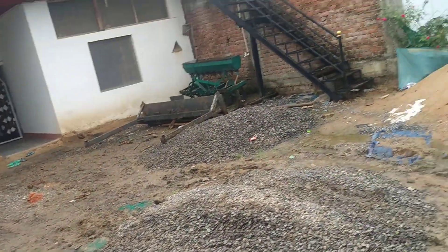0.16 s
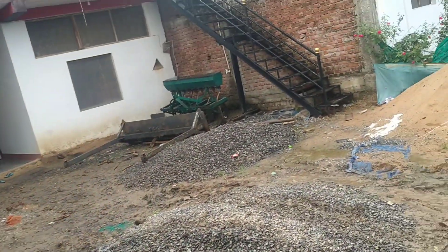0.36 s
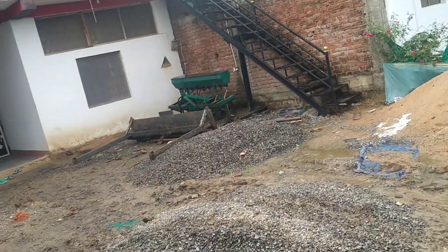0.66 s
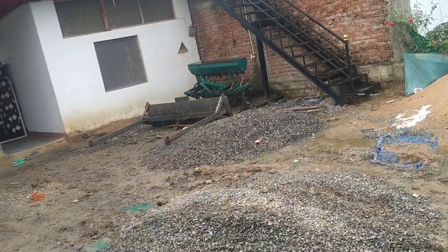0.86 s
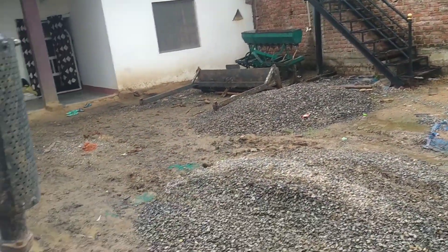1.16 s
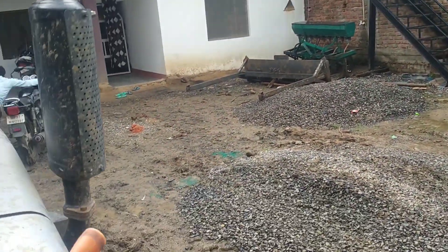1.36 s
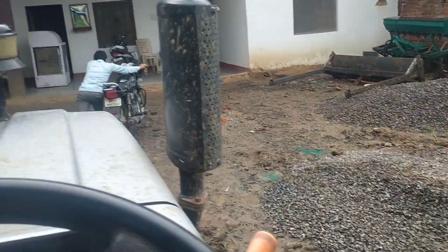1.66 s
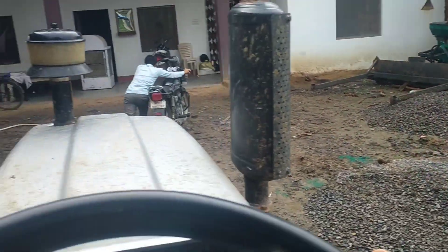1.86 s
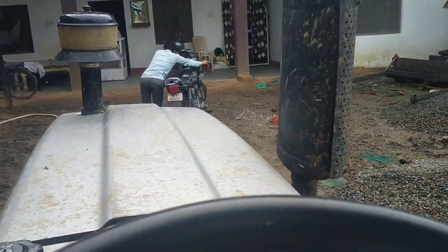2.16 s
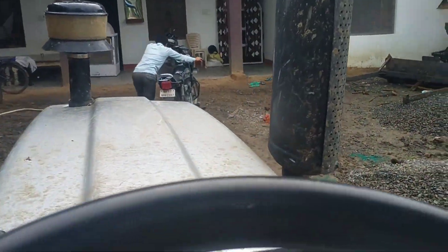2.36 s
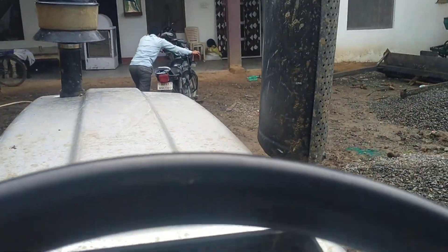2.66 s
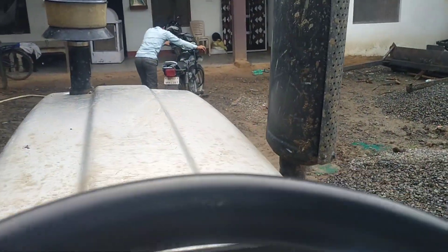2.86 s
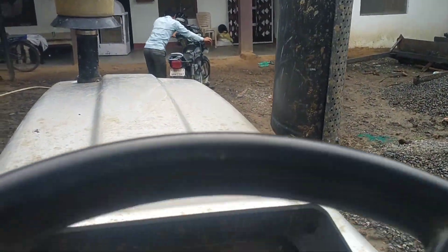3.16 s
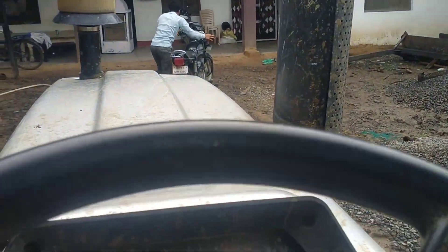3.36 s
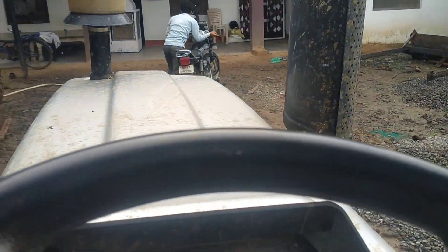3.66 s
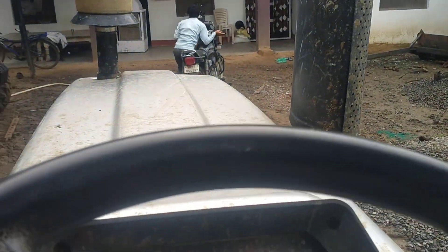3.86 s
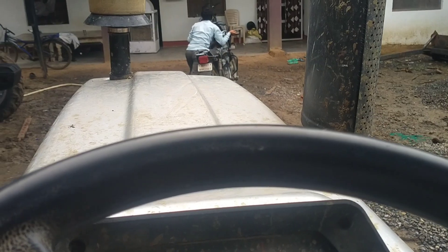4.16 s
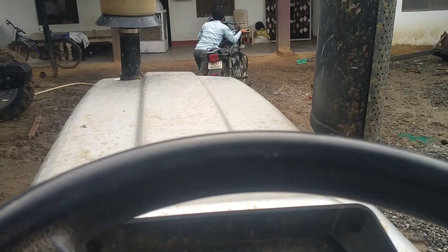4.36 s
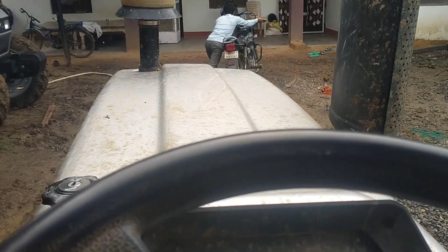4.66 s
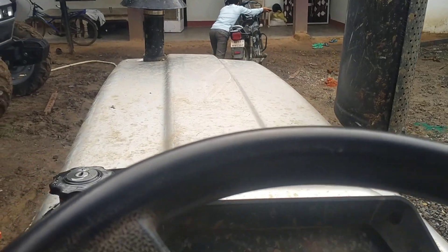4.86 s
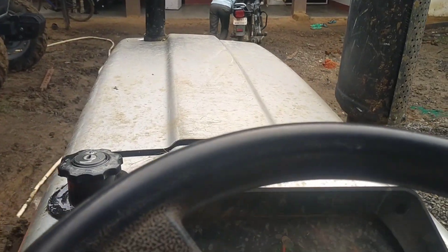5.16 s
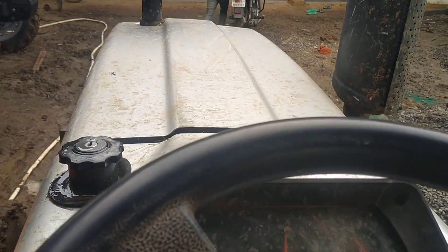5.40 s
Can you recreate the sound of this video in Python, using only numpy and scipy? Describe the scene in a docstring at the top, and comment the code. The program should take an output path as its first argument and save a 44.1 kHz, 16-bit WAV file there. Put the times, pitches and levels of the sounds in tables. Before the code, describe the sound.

A tractor diesel idles with fast, uneven knocking, is shut off and clatters to a stop, then a sharp metallic scrape and dull clunk.

```python
"""In a walled yard, heard from the driver's seat, a three-cylinder tractor diesel idles unevenly.
Noise bursts through block resonances make the knocks, filtered pulses the exhaust. The governor hunts:
four fuelled strokes, then two slack ones. The fuel is cut and the engine clatters to rest.
Then resonant noise makes a sharp metallic scrape; a dull clunk with a sinking tone follows,
probably the stop knob sliding home."""
import sys
import numpy as np
from scipy import signal
from scipy.fft import rfft, irfft
from scipy.io import wavfile
from scipy.ndimage import uniform_filter1d

SR = 44100
rng = np.random.default_rng(int(sys.argv[2]) if len(sys.argv) > 2 else 0)


def generate_wav(signal):
    """Clip the signal to [-1, 1] and save it as 16-bit WAV at the path in sys.argv[1]."""
    frames = np.transpose(np.atleast_2d(signal))
    scaled = np.clip(frames, -1, 1) * 32767
    pcm = np.round(scaled).astype(np.int16)
    wavfile.write(sys.argv[1], SR, pcm)


N = 243873
TIME = np.arange(N) / SR
# when the fuel is cut, and the time in which the crank speed then falls to 1/e
FUEL_CUT_S, COAST_S = 2.39, 0.94

# Levels in all tables are relative: filters normalise the spectra, and most functions add a level of their own.
# clacks of gears and pistons as the engine runs down: start_s, level_db, hold_s
CLACK_TIMES = [(2.571, -20.5, 0.0098), (2.646, -24.5, 0.017), (2.716, -26.5, 0.022), (2.802, -19.5, 0.01),
               (2.89, -25.5, 0.025), (2.99, -29, 0.031), (3.092, -25, 0.0092), (3.142, -26.5, .012),
               (3.224, -31, 0.039), (3.276, -27, 0.0098), (3.354, -30, 0.013), (3.403, -32.5, 0.028),
               (3.436, -31.5, 0.01), (3.558, -31, 0.0046), (3.664, -30.5, 0.0068), (3.791, -31.5, 0.025),
               (3.849, -37, 0.008), (3.901, -30, 0.008), (4.154, -34.5, .014), (4.421, -36.5, .016),
               (4.593, -35, .008), (4.62, -38.5, 0.012), (4.65, -34, 0.011), (4.73, -35, 0.015),
               (4.969, -38, .017)]
# spectrum of the firing block: frequency_hz, level_db (per Hz)
BLOCK_SPECTRUM = [(88, -44), (150, 2.5), (253, -13.5), (290, -6), (345, -8), (403, 1), (630, -5.5),
                  (1040, 2.5), (1870, 0.5), (2700, -2.5), (5220, -18), (6330, -17), (8980, -28),
                  (13200, -23), (15400, -29.5)]
# spectrum of the coasting engine: frequency_hz, level_db (per Hz)
COASTING_SPECTRUM = [(88, -32), (150, -9.5), (248, -9), (290, -7), (332, -5), (471, 0.5), (561, -5.5),
                     (1060, -2), (1290, -5.5), (1690, 0), (2970, -6.5), (4730, -23.5), (6580, -23.5),
                     (8980, -37), (15400, -33)]
# resonances of block and bonnet: frequency_hz, width_hz, lift_db
PANEL_MODES = [(297, 29, 8.5), (397, 12, 4.5), (488.3, 26, 7), (551, 8.3, 3), (789, 42, 5), (862, 7.4, 5),
               (1058, 52, 2), (1210, 230, -0.5), (1396, 65, 2.5), (1570, 38, 0), (1715, 9, -5),
               (1687, 110, 4.5), (1954, 10, 9), (2170, 21, 8), (2295, 67, 1.5), (2634, 300, 2),
               (2956, 32, 6.5), (3450, 34, 5.5), (3970, 170, 3.5)]
# the dash panel's low boom: frequency_hz, level_db (per Hz)
DASH_SPECTRUM = [(60, -30), (105, 0), (130, 2), (175, 8.5), (230, -3), (290, -17), (600, -47), (2000, -83)]


def amp(db):
    """Level to amplitude: 20 dB is a factor of ten."""
    return 10 ** (np.asarray(db) / 20)


def unit(x):
    """Power normalisation: scales to rms 1."""
    return x / np.sqrt(np.mean(x ** 2) + 1e-20)


def add(mix, s, sound):
    """Superposition: adds a sound to the mix, in place, from time s."""
    start = round(s * SR)
    sound = sound[max(-start, 0):]
    part = mix[max(start, 0):][:len(sound)]
    part += sound[:len(part)]


def colour(x, spectrum, modes=(), size=16384):
    """Minimum-phase filtering at unit power: a broad spectrum lifted by ringing resonances."""
    hz = abs(np.fft.fftfreq(size, 1 / SR))
    f, db = np.transpose(spectrum)
    shape_db = np.interp(np.log(hz + 1), np.log(f + 1), db)
    for centre, width, lift in modes:
        shape_db = shape_db + lift / (1 + (2 * (hz - centre) / width) ** 2)
    log_gain = np.log(amp(np.maximum(shape_db, -100)))
    # the Hilbert transform of the log gain gives the phase of a causal response
    response = np.exp(np.conj(signal.hilbert(log_gain)))
    ring = np.fft.ifft(response).real[:size // 2]
    return signal.oaconvolve(x, ring / np.linalg.norm(ring))[:N]


def grit(count, spread_db):
    """Impact noise: dense tiny impacts whose sizes vary over about a millisecond."""
    sizes = unit(uniform_filter1d(rng.standard_normal(count), size=44))
    return unit(rng.standard_normal(count) * amp(spread_db * np.clip(sizes, -2, 2)))


def blow(t, rise, t60, hold=0):
    """Exponential rise and decay: a blow starts at t = 0, is held, then loses 60 dB in each t60."""
    t = np.maximum(t, 0)
    attack = 1 - np.exp(-t / max(rise, 1e-4))
    return attack * amp(-60 * np.maximum(t - hold, 0) / t60)


def tint(x, treble_db, low_db, edge_db, uneven_db=3):
    """Spectral shaping: tilts one blow's bands and favours narrow bands by chance."""
    hz = np.fft.rfftfreq(len(x), 1 / SR)
    shelf_db = np.interp(hz, [650, 1100, 1800, 2700, 4000, 5500],
                         [low_db, 0, 0, edge_db, edge_db, treble_db])
    favoured_db = uneven_db * unit(uniform_filter1d(rng.standard_normal(len(hz)), size=30))
    return irfft(rfft(x) * amp(shelf_db) * unit(amp(favoured_db)), len(x))


def strokes():
    """Governor hunting: lists each stroke's time, its surge's strength and its surge row."""
    # surges of six strokes: start_s, strength_db, first_stroke_kick_db
    rounds = [(-0.099, 1, 0), (0.277, 0.5, 1.5), (0.655, 0, 0), (1.035, 0.4, -1.5), (1.421, 0.5, 0.2),
              (1.796, 0.5, -2), (2.178, -2.8, 3)]
    # strokes of a surge, four fuelled and two slack:
    # knock_db, clatter_rise_s, clatter_hold_s, crack_db, thud_db, puff_db, rasp_db
    surge = [(-12.5, 0.0023, 0.014, -8, 5.5, 1.5, -3), (-12, 0.0049, 0.011, -2, -12, 1.5, 8),
             (-11.5, 0.0025, .012, -5.5, -21, 0.5, 4), (-15.5, 0.0024, 0.018, -16, 0.5, -3, -12),
             (-20, 0.0027, 0.019, -21, -9, -6, -22), (-17.5, 0.0019, 0.0092, -9, -35, -4, -28)]
    stroke_s = 0.0633  # from one firing to the next
    return [(start + k * stroke_s, db + kick_db * (k == 0), *row)
            for start, db, kick_db in rounds for k, row in enumerate(surge)]


def speed(s):
    """Exponential deceleration: crank speed as a share of idle, falling from the fuel cut on."""
    return np.exp(-np.maximum(s - FUEL_CUT_S, 0) / COAST_S)


def knocks(knock_db=-6, t60=0.2, crack_db=-1, crack_t60=0.096, crack_treble_db=-7,
           rasp_db=-29, rasp_s=.043, rasp_low_db=-2, rasp_treble_db=5,
           spread_db=0.64, uneven_db=.5, unfuelled_treble_db=-5):
    """Impact excitation: firing cracks the block, pistons and gears clatter, the exhaust valve rasps open."""
    out, t = np.zeros(N), np.arange(8192) / SR
    # the treble rises from the first level to the second between these times
    brighten_s, brighten_db = (0.66, 1.44), (-2, 0.45)
    for s, surge_db, stroke_db, rise, hold_s, burn_db, _, _, open_db in strokes():
        db = surge_db + stroke_db + uneven_db * rng.standard_normal()
        bright_db = np.interp(s, brighten_s, brighten_db)
        treble_db = bright_db + unfuelled_treble_db * (s > FUEL_CUT_S)
        clatter = blow(t, rise, t60, hold_s) * grit(len(t), spread_db)
        add(out, s, amp(db + knock_db) * tint(clatter, treble_db, 0, bright_db))
        crack = blow(t, .0004, crack_t60, .002) * rng.standard_normal(len(t))
        crack = tint(crack, crack_treble_db, 0, crack_treble_db / 2)
        add(out, s, amp(db + crack_db + burn_db) * crack)
        rasp = blow(t, .004, .11, .01) * grit(len(t), spread_db)
        rasp = tint(rasp, rasp_treble_db + bright_db, rasp_low_db, rasp_treble_db / 2)
        add(out, s + rasp_s, amp(rasp_db + open_db) * rasp)
    return colour(out, BLOCK_SPECTRUM, PANEL_MODES)


def walls(x, wet_db=-20, t60=0.43):
    """Diffuse reflection: the house fronts scatter a short, thin echo of sparse random taps."""
    t = np.arange(SR // 2) / SR
    sparse = rng.random(len(t)) < .04
    taps = rng.standard_normal(len(t)) * sparse * blow(t - .012, 0.01, t60)
    taps = signal.lfilter([1], [1, -.5], taps)  # soften the treble
    return amp(wet_db) * signal.oaconvolve(x, taps / np.linalg.norm(taps))[:N]


def thuds(thud_hz=158, thud_db=-23, t60=0.039):
    """Damped oscillation: each stroke jolts the block on its frame, the first and fourth of a surge most."""
    out, t = np.zeros(N), np.arange(8192) / SR
    for s, *_, jolt_db, _, _ in strokes():
        hz = thud_hz * rng.uniform(1.0, 1.084)
        jolt = np.sin(2 * np.pi * hz * t) * blow(t, 0.00079, t60)
        add(out, s, amp(thud_db + jolt_db) * jolt)
    return out


def exhaust(delay_s=.041, echo_s=0.02745, echo=0.51, puff_db=-32.0, jitter_s=0.0018,
            uneven_db=0.7, unfuelled_db=-8, pumped_db=-10):
    """Pulse excitation and reflection: puffs boom in the stack and echo off the house wall."""
    # the exhaust pipe: frequency_hz, level_db (per Hz)
    pipe = [(8, -44), (16, -22), (24, -16), (32, 7.5), (47, 4.5), (63, 3), (80, 7), (105, -1.5), (165, -24),
            (250, -13), (500, -56)]
    puffs = np.zeros(N)
    for s, *_, gas_db, _ in strokes():
        leaves = s + delay_s + jitter_s * rng.standard_normal()
        db = gas_db + uneven_db * rng.standard_normal() + unfuelled_db * (leaves > FUEL_CUT_S)
        add(puffs, leaves, amp([db]))
    for s, _, _ in CLACK_TIMES:  # without fuel the pistons only pump air
        add(puffs, s + delay_s, amp([pumped_db]) * speed(s) ** 3)
    boom = colour(puffs, pipe)
    reflected = echo * np.interp(TIME - echo_s, TIME, boom, left=0)
    return amp(puff_db) * unit(boom + reflected)


def churn(running_db=-32.5, coasting_db=-33, speed_power=1.43, spread_db=0.8):
    """Speed-dependent noise: gears, fan and valve train rustle and fade with the crank speed."""
    running = np.interp(TIME - FUEL_CUT_S, [-.04, .16], [1, 0])
    rustle = speed(TIME) ** speed_power * grit(N, spread_db)
    fired = colour(amp(running_db) * running * rustle, BLOCK_SPECTRUM, PANEL_MODES)
    coasting = colour(amp(coasting_db) * (1 - running) * rustle, COASTING_SPECTRUM, PANEL_MODES)
    return fired + coasting


def chassis(idle_db=-44):
    """Low-frequency random vibration: the chassis trembles at idle, rocks harder, then settles."""
    # how hard it rocks after the fuel cut: time_s, level_db
    rocking = [(2.45, -38), (3.45, -38), (4.0, -46.5), (4.8, -55), (5.5, -56.5)]
    # the shaking chassis: frequency_hz, level_db (per Hz)
    shake = [(10, -2.5), (20, -12), (30, 10.5), (45, -5), (75, -3), (110, -9), (200, -14.5), (300, -23.5),
             (600, -70)]
    times, db = np.transpose([(FUEL_CUT_S - .1, idle_db), *rocking])
    return amp(np.interp(TIME, times, db)) * colour(rng.standard_normal(N), shake)


def air(rumble_db=-50.5, wash_db=-57):
    """Stationary noise: the low rumble of the yard under a faint, steady wash."""
    # the yard air: frequency_hz, level_db (per Hz)
    yard = [(12, -55), (20, 2), (47, -14.5), (64, 3), (76, -6), (122, -7), (175, -10.5), (259, -18),
            (306, -12), (1410, -19.5), (1670, -17), (8380, -41.5), (15400, -38.5)]
    rumble = amp(rumble_db) * colour(rng.standard_normal(N), yard)
    return rumble + amp(wash_db) * colour(rng.standard_normal(N), COASTING_SPECTRUM)


def swish(seep_db=-63):
    """Turbulence noise: a faint hiss with swells, probably compression leaking past the rings."""
    # swells between the last strokes: start_s, length_s, level_db
    swells = [(4.02, 0.23, -52.5), (4.29, 0.092, -52), (4.862, 0.1, -52.5)]
    # the hiss: frequency_hz, level_db (per Hz)
    hiss = [(500, -45), (1500, 9), (2600, 10), (4200, 1), (6500, -4), (9000, -18), (13000, -12),
            (16000, -15)]
    leak = amp(seep_db) * (TIME < CLACK_TIMES[-1][0])  # steady until the last clack
    for s, length, db in swells:
        leak = leak + amp(db) * np.sin(np.pi * np.clip((TIME - s) / length, 0, 1))
    return colour(leak * rng.standard_normal(N), hiss)


def loose_parts(rate_per_s=24, tap_db=-34, speed_power=0.9, t60=0.069, spread_db=2.5,
                uneven_db=6.5, treble_db=-4, edge_db=3):
    """Random impacts: small bright rattles at jittered intervals weaken as the engine coasts."""
    out, t = np.zeros(N), np.arange(8192) / SR
    for k, (late, size) in enumerate(rng.uniform(-1, 1, (60, 2))):
        s = FUEL_CUT_S + (k + 2 + late / 2) / rate_per_s
        tap = blow(t, 0.0027, t60, 0.0071) * grit(len(t), spread_db)
        tap = tint(tap, treble_db, 0, edge_db)
        add(out, s, amp(tap_db + uneven_db * size) * speed(s) ** speed_power * tap)
    return colour(out, BLOCK_SPECTRUM, PANEL_MODES)


def run_down(clack_db=-5.0, t60=0.19, rise=0.0024, slowing=0.053, spread_db=2, first_db=-5,
             first_t60=0.058, treble_db=-1.5, low_db=-3, edge_db=1.0, hollow_db=4, dull_db=-2):
    """Backlash impacts: without fuel the clacks ring longer and hollower as the crank slows."""
    out, t = np.zeros(N), np.arange(12000) / SR
    for s, db, hold_s in CLACK_TIMES:
        stretch, lost = speed(s) ** -slowing, 1 - speed(s)
        # the hard first contact fades with the speed
        contact = amp(first_db) / stretch ** 2 * blow(t, rise / 2, first_t60)
        rattle = blow(t, rise * stretch, t60 * stretch, hold_s)
        clack = (contact + rattle) * grit(len(t), spread_db)
        clack = tint(clack, treble_db, low_db + hollow_db * lost, edge_db + dull_db * lost)
        add(out, s, amp(db + clack_db) * clack)
    return colour(out, COASTING_SPECTRUM, PANEL_MODES)


def ticks(t60=0.039):
    """Light impacts: loose metal ticks thinly, as short bursts of bright noise."""
    # ticks of loose metal: start_s, level_db
    tick_times = [(3.436, -41.5), (3.618, -48), (4.959, -44), (4.986, -41)]
    taps = sum(amp(db) * blow(TIME - s, .0005, t60) for s, db in tick_times)
    return colour(taps * rng.standard_normal(N), [(1000, -15), (5000, 1), (9000, -8), (14000, -1)])


def intake(width_hz=120, rise=0.015, t60=0.13):
    """Cavity resonance: air drawn through the air cleaner rings its can in hollow gulps."""
    # gulps on the last strokes: start_s, pitch_hz, level_db
    gulps = [(3.67, 462, -46), (3.959, 514, -40), (4.17, 475, -43), (4.43, 495, -42), (4.629, 297, -41),
             (4.74, 533, -52), (4.98, 453, -42.5)]
    out, t = np.zeros(N), np.arange(8192) / SR
    for s, hz, db in gulps:
        pole = np.exp((2j * np.pi * hz - np.pi * abs(width_hz)) / SR)
        draught = rng.standard_normal(2 * len(t))
        # the first half lets the resonator settle
        hoot = signal.lfilter([1], np.poly([pole, pole]), draught).real[len(t):]
        add(out, s, amp(db) * unit(hoot) * blow(t, rise, t60, 0.026))
    return out


def bump(bump_s=3.978, bump_db=-46, rise=.006, t60=0.15, hold_s=0.018):
    """Soft impact: the rocking engine nudges the dash panel once."""
    nudge = amp(bump_db) * blow(TIME - bump_s, rise, t60, hold_s)
    return colour(nudge * rng.standard_normal(N), DASH_SPECTRUM)


def knob_scrape(pull_s=5.204, jerk_db=-20.5, jerk_s=0.028, jerk_low_db=-4,
                slide_db=-32.0, slide_s=0.081, slide_low_db=1, spread_db=1.0):
    """Friction excitation: the rod jerks free with a thin rasp and scrapes softly through its guide."""
    # the scrape: frequency_hz, level_db (per Hz)
    scrape = [(88, -59), (150, -6), (296, -24), (380, -12), (583, -7.5), (668, -19), (750, -4),
              (1130, -8.5), (1630, 0.5), (1940, -6), (5530, -15.5), (7110, -14), (9150, -26),
              (11100, -15.5), (15400, -19)]
    # resonances of the knob's rod and the dash: frequency_hz, width_hz, lift_db
    rod = [(485, 27, 8), (900, 36, 7), (1700, 100, 6), (1800, 33, 1), (2140, 30, 10), (2550, 32, 13.5),
           (2926, 53, 11.5), (3600, 97, 8), (4000, 130, 7.5), (5100, 30, -6), (7340, 54, 13.5),
           (10500, 70, 7), (13100, 45, 5), (14600, 60, 9)]
    t = TIME - pull_s  # both parts start together; the softer one lasts longer
    jerk = amp(jerk_db) * blow(t, 0.0086, 0.058, jerk_s) * grit(N, spread_db)
    slide = amp(slide_db) * blow(t, .004, .23, slide_s) * grit(N, spread_db)
    friction = tint(jerk, 0, jerk_low_db, 0, 0) + tint(slide, 0, slide_low_db, 0, 0)
    return colour(friction, scrape, rod)


def knob_clunk(clunk_s=5.394, clunk_db=-32, rebound_s=0.029, rebound_db=-10, spread_db=0.5,
               boom_db=-37, ring_db=-35, ring_s=0.016, flexed_hz=215, relaxed_hz=125,
               relax_s=0.031, ring_t60=0.19):
    """Impact and relaxation: the knob seats and rebounds; the panel booms, its note sinking."""
    # the clunk: frequency_hz, level_db (per Hz)
    clunk_spectrum = [(120, -29), (200, -10), (443, -20), (659, -18.5), (849, -12), (1040, -22),
                      (1660, -13), (3940, -23), (4720, -39), (15000, -58)]
    t = TIME - clunk_s
    seat = blow(t, .001, 0.096, 0.0053)
    rebound = amp(rebound_db) * blow(t - rebound_s, 0.00091, 0.11)
    clunk = colour(amp(clunk_db) * (seat + rebound) * grit(N, spread_db), clunk_spectrum)
    boom = amp(boom_db) * blow(t, 0.012, 0.26, 0.014) * rng.standard_normal(N)
    hz = relaxed_hz + (flexed_hz - relaxed_hz) * np.exp(-np.maximum(t - ring_s, 0) / relax_s)
    note = np.sin(2 * np.pi * np.cumsum(hz) / SR)
    ring = amp(ring_db) * blow(t - ring_s, .002, ring_t60) * note
    return clunk + colour(boom, DASH_SPECTRUM) + ring


def scene():
    """Superposition of engine, controls and yard air; the clatter also echoes off the walls."""
    clatter = knocks() + swish() + loose_parts() + run_down() + ticks() + intake() + bump()
    clatter = clatter + knob_scrape() + knob_clunk()
    engine = clatter + walls(clatter) + thuds() + exhaust() + churn() + chassis()
    return (engine + air())[None]


def record(dry, edge_hz=15660):
    """Band limiting: a linear-phase low-pass removes the highest treble."""
    low_pass = signal.firwin(511, edge_hz, window=("kaiser", 9), fs=SR)
    return signal.oaconvolve(dry, low_pass[None], "same")


dry = scene()
out = record(dry)
generate_wav(out)
```